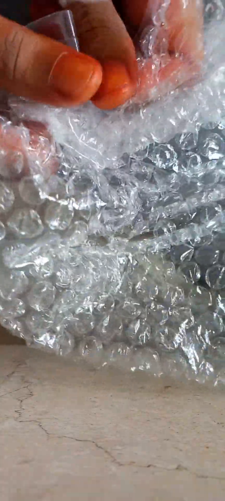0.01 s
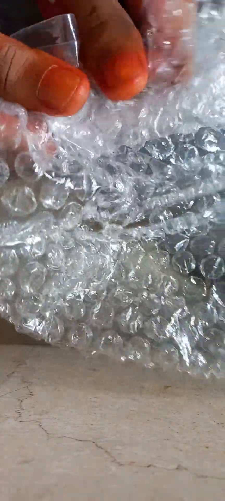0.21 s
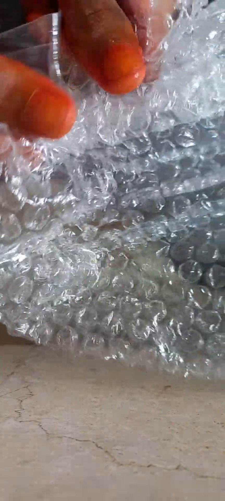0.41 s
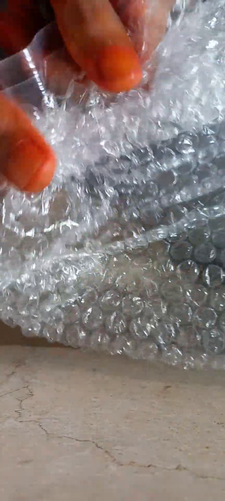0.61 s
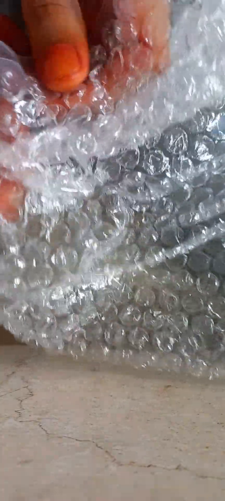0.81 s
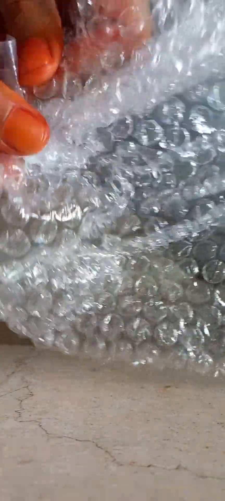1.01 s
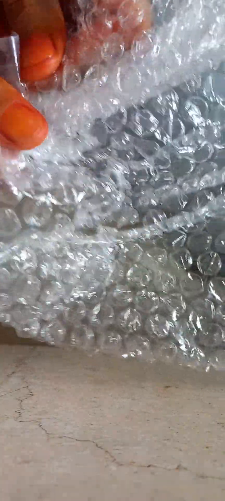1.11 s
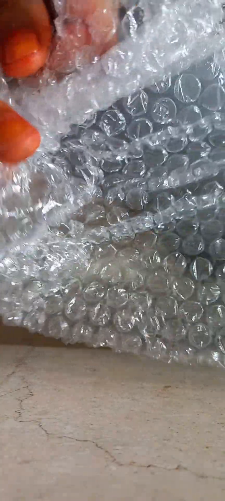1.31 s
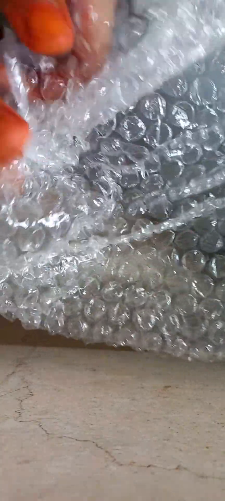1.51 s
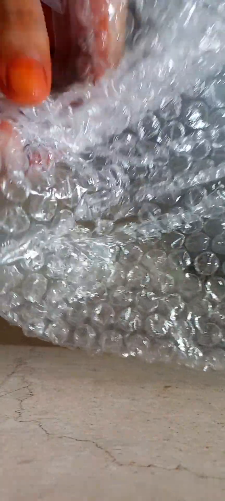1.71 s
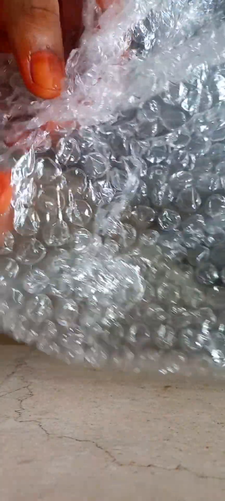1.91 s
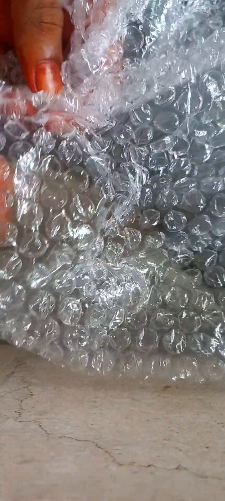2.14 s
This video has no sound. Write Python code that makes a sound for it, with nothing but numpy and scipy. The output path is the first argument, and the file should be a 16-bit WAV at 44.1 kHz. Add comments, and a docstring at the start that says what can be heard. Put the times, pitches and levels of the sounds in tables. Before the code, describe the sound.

Bubble wrap is squeezed by hand close to the microphone, slightly left. A quick run of sharp pops is followed by crinkling, one more pop and denser crackling, in an echoing room with a faint low hum.

```python
"""Bubble wrap in an echoing room

Hands squeeze bubble wrap close to the left microphone of a small recorder in a hard room.
Bubbles burst with a sharp crack and a push of air; folds click and the film crinkles.
A low hum throbs behind, and a fast limiter ducks everything for a moment at each loud burst."""
import sys
import numpy as np
from scipy import signal
from scipy.fft import rfft, irfft
from scipy.io import wavfile
from scipy.ndimage import uniform_filter1d, minimum_filter1d

SR = 44100
rng = np.random.default_rng(int(sys.argv[2]) if len(sys.argv) > 2 else 0)


def transcribe(signal):
    """Save signal, clipped to [-1, 1], as a 16-bit WAV file at the path in sys.argv[1]."""
    frames = np.atleast_2d(signal).T
    limited = np.clip(frames, -1, 1)
    pcm = np.round(limited * 32767).astype(np.int16)
    wavfile.write(sys.argv[1], SR, pcm)


N = 97020

# The low sounds. Each row: time in seconds, then levels in dB of mains hum, tone above it, rubbing.
LOW_LEVELS = [(0.0, -64, -56, -59.5), (0.14, -50, -56, -61.5), (0.32, -58.5, -58, -68),
              (0.6, -57, -71, -57.5), (0.72, -50.5, -57, -59), (0.81, -59, -53, -65),
              (1.08, -58.5, -61.5, -58), (1.16, -80, -63.5, -83), (1.3, -50, -55, -59),
              (1.64, -57.5, -65, -55.5), (1.68, -74, -59, -60), (1.95, -49.5, -65, -44),
              (2.02, -52, -57, -54), (2.2, -57.5, -63.5, -53.5)]


def amp(db):
    return 10 ** (np.asarray(db) / 20)


def unit_rms(x):
    return x / np.sqrt(np.mean(x ** 2) + 1e-20)


def at_hz(points, hz):
    f, value = np.transpose(points)
    return np.interp(np.log(hz + 1), np.log(f + 1), value)


def envelope(rows, column=1):
    rows = np.array(rows)
    return amp(np.interp(np.arange(N) / SR, rows[:, 0], rows[:, column]))


def add(mix, start_s, sound):
    part = mix[round(start_s * SR):][:len(sound)]
    part += sound[:len(part)]


def ring(hz, width_hz, rise_s=.00008):
    """A struck resonance with a soft start, peak 1."""
    t = np.arange(256) / SR
    wave = np.sin(2 * np.pi * hz * t) * np.exp(-np.pi * width_hz * t) * (1 - np.exp(-t / rise_s))
    return wave / abs(wave).max()


def snap(hz):
    """The brief, bright edge of a click or burst."""
    return ring(hz, width_hz=4200, rise_s=.00018)


def diffuse_noise(spectrum):
    """Steady noise, alike at both microphones in the bass only."""
    # Each row: frequency in Hz, left-right likeness from 0 to 1.
    coherence = [(60, 1), (200, 1), (650, .1), (1500, 0.01)]
    hz = np.fft.rfftfreq(N, 1 / SR)
    left, other = rfft(rng.standard_normal((2, N)))
    alike = at_hz(coherence, hz)
    right = alike * left + np.sqrt(1 - alike ** 2) * other
    return unit_rms(irfft(np.array([left, right]) * amp(at_hz(spectrum, hz)), N))


def close_left(x, scatter_db):
    """Direct sound and its scatter off the folds; later, weaker and duller at the right microphone."""
    scatter_s, right_lag_s = .0013, .00042
    lag = np.arange(400)
    echoes = rng.standard_normal((2, 400)) * np.exp(-lag / SR / scatter_s) * (lag > 26)
    echoes /= np.linalg.norm(echoes[0])
    left, right = x + amp(scatter_db) * signal.oaconvolve(x[None], echoes, axes=1)[:, :N]
    dull = signal.lfilter(*signal.butter(1, 2490, fs=SR), right)
    return np.array([left, amp(-12) * np.pad(dull, (round(right_lag_s * SR), 0))[:N]])


def room_air():
    """The quiet air of the room."""
    # Each row: frequency in Hz, relative noise density in dB.
    spectrum = [(18, -45), (30, 9.5), (109, -1), (229, -4), (314, -24.5), (1000, -21.5), (4900, -15.5),
                (8310, -28.5), (13400, -19), (16500, -37)]
    return amp(-56.5) * diffuse_noise(spectrum)


def hum():
    """Mains hum beating with a wavering tone above it, a little louder on the right."""
    mains_hz, upper_hz = 98.4, 114
    wander_s, wander_rad, right_lag_s = .15, .6, .00077
    t = np.arange(N) / SR
    drift = unit_rms(signal.lfilter(*signal.butter(2, 1 / wander_s, fs=SR), rng.standard_normal(N)))
    upper = np.sin(2 * np.pi * (upper_hz * t + rng.random()) + wander_rad * drift)
    mains = np.sin(2 * np.pi * (mains_hz * t + rng.random()))
    tones = np.sqrt(2) * (envelope(LOW_LEVELS, 1) * mains + envelope(LOW_LEVELS, 2) * upper)
    return np.array([tones, amp(2.5) * np.interp(t - right_lag_s, t, tones)])


def reverb(send):
    """Sparse reflections off hard walls build up, then die band by band."""
    # Each row: frequency in Hz, seconds to fall by 60 dB.
    decay = [(150, 1.35), (400, 0.97), (1040, 0.76), (2760, 0.77), (7280, 0.65), (14000, 0.45)]
    # Each row: frequency in Hz, relative level of the reflections in dB.
    colour = [(88, -60), (150, -9.5), (300, -9), (446, -3.5), (1500, -3.5), (5390, 3), (7700, -7),
              (15100, -15), (17000, -69)]
    build_s = .015
    slots = np.arange(40, 50000, 10)
    arrivals = slots + rng.integers(0, 10, (2, len(slots)))
    taps = np.zeros((2, 50020))
    np.put_along_axis(taps, arrivals, rng.choice([-1., 1.], arrivals.shape), 1)
    hz, t, bands = signal.stft(taps, SR, nperseg=256)
    bands *= amp(at_hz(colour, hz)[:, None] - 60 * t / at_hz(decay, hz)[:, None])
    tail = signal.istft(bands, SR, nperseg=256)[1]
    tail *= 1 - np.exp(-np.arange(tail.shape[1]) / SR / build_s)
    return amp(6.5) * signal.fftconvolve(send[None], tail / np.linalg.norm(tail[0]), axes=1)[:, :N]


def rubbing():
    """The dull rubbing of the hands, stronger on the left."""
    # Each row: frequency in Hz, relative noise density in dB.
    spectrum = [(29, -44), (50, -10.5), (98, -7.5), (156, -6.5), (372, -18), (630, -17.5), (1500, -23.5),
                (3300, -120)]
    return envelope(LOW_LEVELS, 3) * amp([[0], [-4]]) * diffuse_noise(spectrum)


def crinkle():
    """Dense tiny creases ring at many pitches as the hands squeeze. Returns direct sound, room send."""
    # The squeeze. Each row: time in seconds, level of the crinkle in dB.
    squeeze = [(0, -48.5), (.1, -49), (.2, -49), (.5, -58), (.75, -46.5), (.86, -64.5), (0.938, -52.5),
               (0.989, -60.5), (1.021, -44), (1.048, -45), (1.12, -103), (1.22, -81), (1.45, -57),
               (1.6, -47.5), (1.72, -59.5), (1.77, -48.5), (1.84, -43.5), (1.93, -44), (2.02, -52.5),
               (2.1, -45), (2.2, -54)]
    # The film's colour. Each row: frequency in Hz, relative level in dB.
    colour = [(1300, -7), (2800, -7), (4300, 4.5), (5900, -4), (7750, -53), (12500, -4), (16000, -6.5)]
    creases_per_s, spread_db = 5500, 3.2
    kicks = amp(spread_db * np.minimum(rng.exponential(1, N), 3.6))
    kicks *= rng.random(N) < creases_per_s / SR
    kicks *= rng.choice([-1, 1], N)
    pitch_index = rng.integers(0, 14, N)
    creases = np.zeros(N)
    for k, hz in enumerate(np.geomspace(1300, 15500, 14)):
        gain = amp(at_hz(colour, hz)) * hz / 5000  # makes up for the shortness of high rings
        crease = gain * ring(hz, width_hz=.52 * hz, rise_s=.54 / hz)
        creases += signal.oaconvolve(kicks * (pitch_index == k), crease)[:N]
    level = envelope(squeeze)
    send = amp(-11) * level * unit_rms(np.diff(kicks, prepend=0))
    return close_left(level * unit_rms(creases), scatter_db=-8), send


def fold_clicks():
    """Single folds of film snap over. Returns direct sound, room send."""
    # Each row: time in seconds, level in dB, ring in Hz, snap relative to the ring in dB.
    folds = [(.0065, -26, 4700, -20), (0.0538, -23, 5600, -7.5), (0.081, -26, 4970, -20),
             (0.108, -30, 5000, -15), (0.119, -50, 1810, 20.5), (0.178, -25.5, 4700, -20),
             (0.198, -29, 4800, -20), (0.7278, -26.5, 5070, -14), (0.908, -39.5, 3800, 5),
             (0.9337, -31.5, 4620, -25), (0.938, -29.5, 5260, -3), (.9468, -35, 5000, -23),
             (0.9646, -27, 4680, -31), (0.9928, -30, 5200, -23), (1.0798, -34, 4900, 1),
             (1.1255, -37.5, 4600, -15), (1.1453, -39, 4970, 1), (1.156, -34, 4750, -16),
             (1.1886, -22.5, 6200, -35), (1.2102, -34, 2920, -12), (1.23, -24.5, 5140, -17),
             (1.257, -31, 4710, -14), (1.2744, -38, 4640, -2), (1.616, -31.5, 4600, -15),
             (1.6657, -30, 5360, -21), (1.812, -29, 5050, -14), (1.821, -31, 4800, 2),
             (1.8371, -21, 1230, -9), (1.8378, -23, 5070, -20), (1.844, -25.5, 4500, -15),
             (1.854, -25.5, 3240, -18), (1.867, -27, 4980, -4), (1.8795, -39, 5000, 8),
             (1.8949, -29, 4120, 1), (1.907, -28, 4600, -10), (1.9196, -27, 4600, -5),
             (2.0562, -35, 3900, -18), (2.068, -31.5, 3630, -16), (2.0734, -26.5, 4270, -6),
             (2.095, -30, 5300, -6), (2.1009, -27, 4160, -5), (2.1133, -24, 4830, -4.5),
             (2.1492, -33, 4200, -14), (2.1813, -30.5, 4700, -1.5)]
    direct, send = np.zeros((2, N))
    for start, db, hz, snap_db in folds:
        click = ring(hz, width_hz=1600, rise_s=.54 / hz) + amp(snap_db) * snap(12500)
        add(direct, start + .001008, amp(db) * click)
        add(send, start + .000994, amp(db - 4.5) * np.array([1, -1]))
    return close_left(direct, scatter_db=-8), send


def bubble_pops():
    """Bubbles burst with a crack and push air at the left microphone. Returns direct sound, room send."""
    # Each row: start in seconds, level in dB, ring pitch, ring width and snap pitch in Hz,
    # then snap, body, air push and room send in dB relative to that level.
    bubbles = [(0.2324, 3.5, 4380, 2090, 12200, -9.5, -17, -60, -6.5),
               (0.3114, 6, 4650, 1500, 12200, -10.5, -13, -59, -17.5),
               (0.3398, 8.5, 5140, 1710, 11760, -3, -8.5, -17.5, -7.5),
               (0.3908, 11.5, 5030, 1490, 10060, -7.5, -8.5, -53, -55),
               (0.4076, 2, 4300, 754, 10500, -4.5, -7.5, -38, -18),
               (0.4218, -1, 3820, 1500, 14900, 2, -8, -43, -5),
               (0.4629, 7, 4640, 1780, 11850, -4, -12.5, -48, -11.5),
               (1.1899, -27.5, 3170, 594, 12450, 11.5, -11, -45, -7),
               (1.292, 5, 4870, 1430, 11800, -8, -8.5, -39, -10)]
    push_s, flap_s, wall_s = .002, .0011, .012
    crack, push, send = np.zeros((3, N))
    age = np.arange(2000) / SR / push_s
    puff = np.e * age * np.exp(-age)
    body = ring(1500, width_hz=5800)
    for start, db, hz, width_hz, snap_hz, snap_db, body_db, push_db, room_db in bubbles:
        snap_gain = amp(snap_db)
        burst = ring(hz, width_hz) + snap_gain * snap(snap_hz) + amp(body_db) * body
        add(crack, start, amp(db) * burst)
        add(crack, start + flap_s, amp(db - 19) * ring(hz, width_hz=700))  # torn film flaps
        add(crack, start + wall_s, amp(db + room_db - 16.5) * burst)  # first echo
        add(push, start, amp(db + push_db) * puff)
        # A brighter snap leaves a brighter tail.
        add(send, start, amp(db + room_db) * np.array([1 + snap_gain, -snap_gain]))
    return close_left(crack, scatter_db=-15) + push * amp([[0], [-14]]), send


def scene():
    """The wrap up close, the room's answer and the low background."""
    direct, sends = zip(bubble_pops(), fold_clicks(), crinkle())
    return sum(direct) + reverb(sum(sends)) + hum() + room_air() + rubbing()


def record(dry):
    """Microphone bass cut and treble dip, a look-ahead limiter on both channels, then the band limit."""
    ceiling_db, recover_db_per_s, edge_hz = -1.5, 434, 16300
    mic = signal.sosfilt(signal.butter(4, 72, "high", fs=SR, output="sos"), dry)
    mic -= .53 * signal.lfilter(*signal.iirpeak(8080, Q=2.66, fs=SR), mic)
    over_db = np.maximum(20 * np.log10(abs(mic).max(0) + 1e-9) - ceiling_db, 0)
    recovery_db = np.arange(N) * recover_db_per_s / SR
    gain_db = recovery_db - np.maximum.accumulate(over_db + recovery_db)
    held_db = minimum_filter1d(gain_db, size=41)
    limited = mic * amp(uniform_filter1d(held_db, size=21))
    lowpass = signal.firwin(401, edge_hz, window=("kaiser", 12), fs=SR)
    return signal.oaconvolve(limited, lowpass[None], "same")


dry = scene()
out = record(dry)
transcribe(out)
```